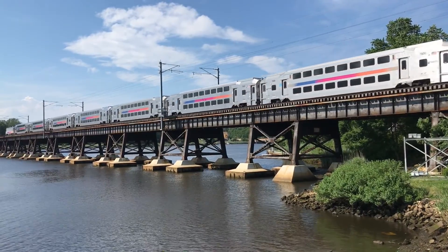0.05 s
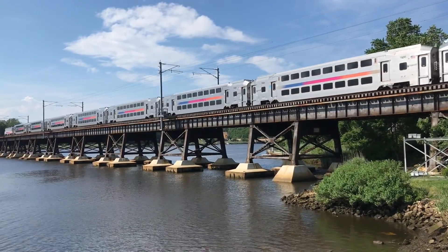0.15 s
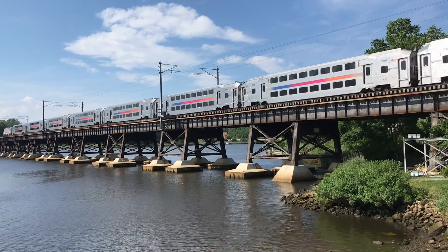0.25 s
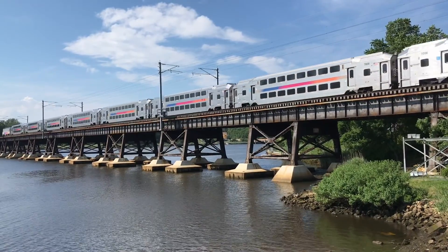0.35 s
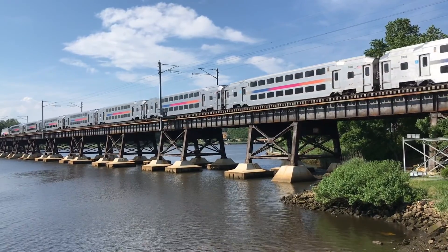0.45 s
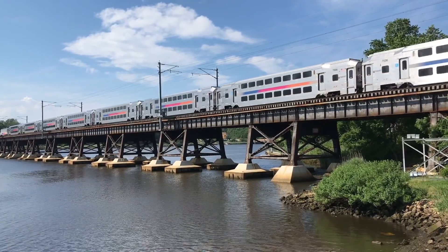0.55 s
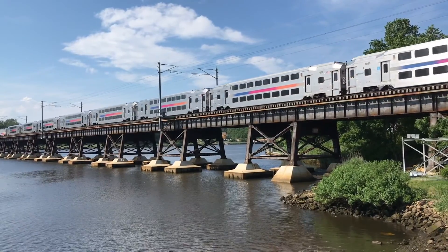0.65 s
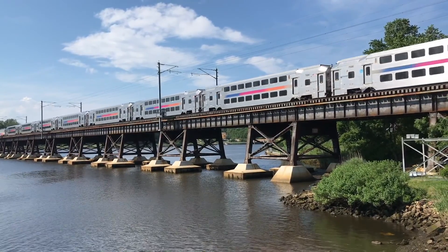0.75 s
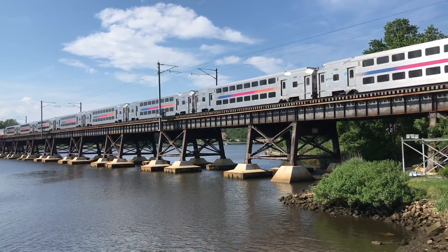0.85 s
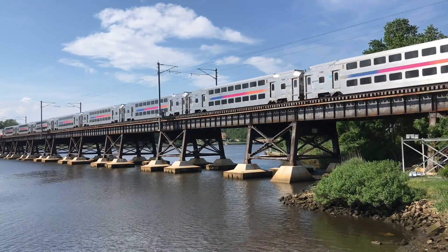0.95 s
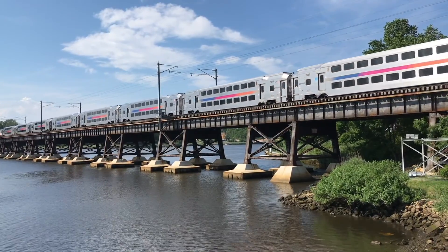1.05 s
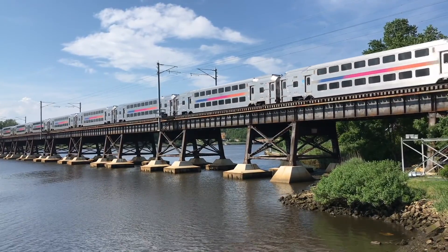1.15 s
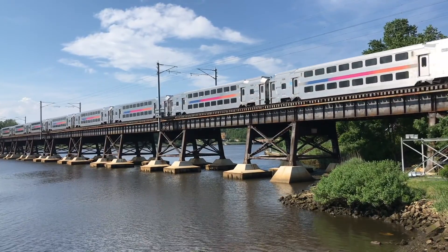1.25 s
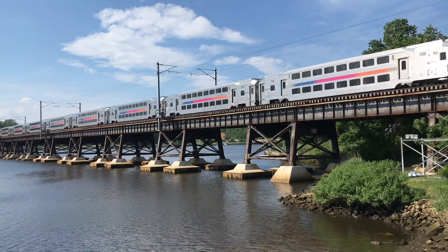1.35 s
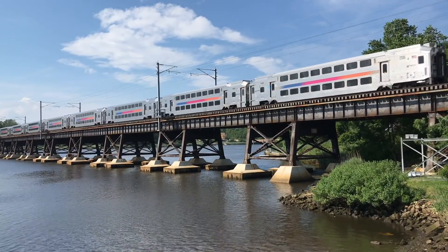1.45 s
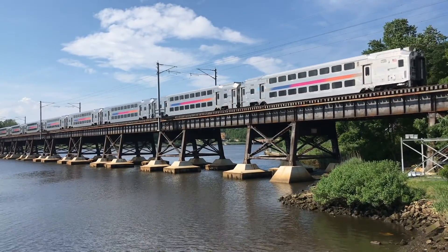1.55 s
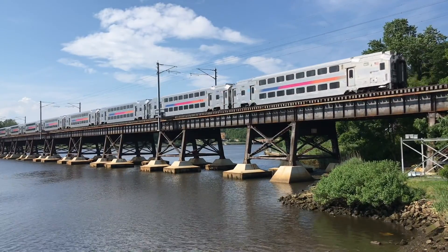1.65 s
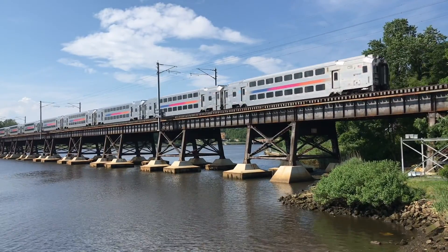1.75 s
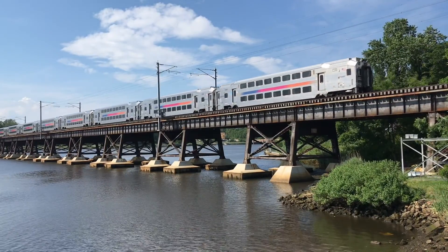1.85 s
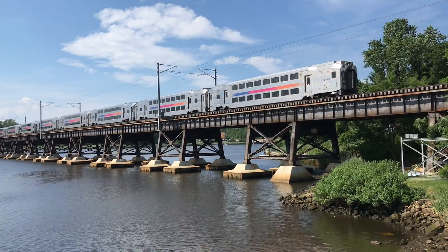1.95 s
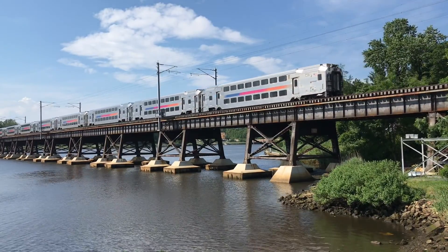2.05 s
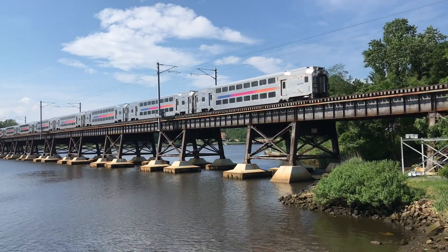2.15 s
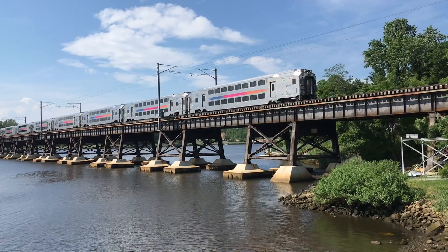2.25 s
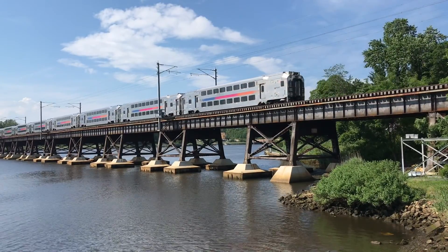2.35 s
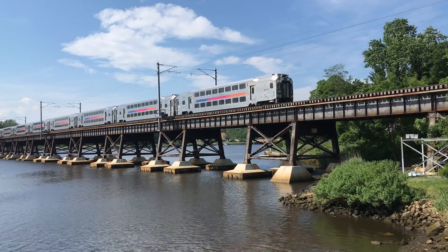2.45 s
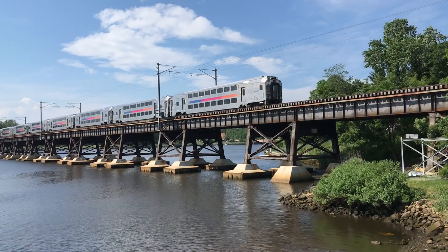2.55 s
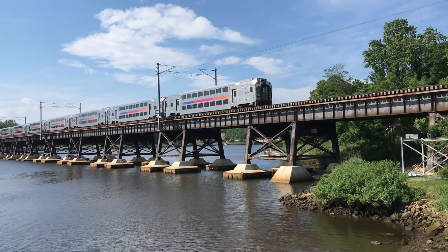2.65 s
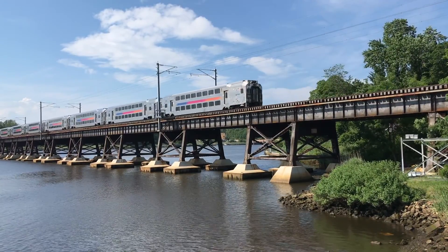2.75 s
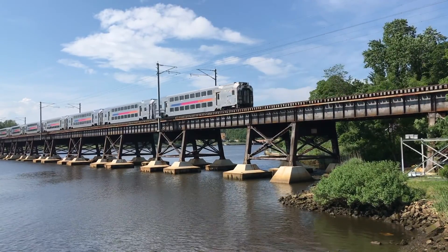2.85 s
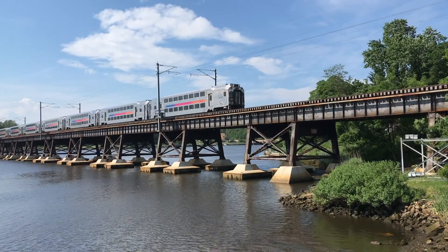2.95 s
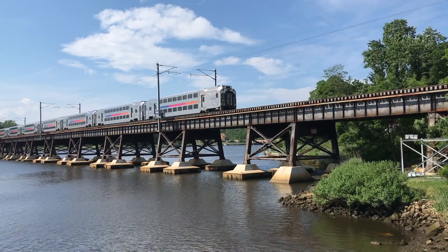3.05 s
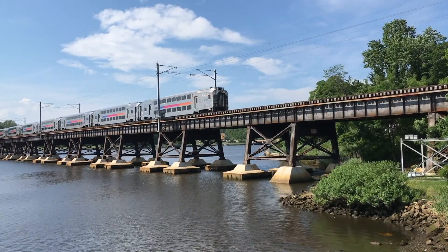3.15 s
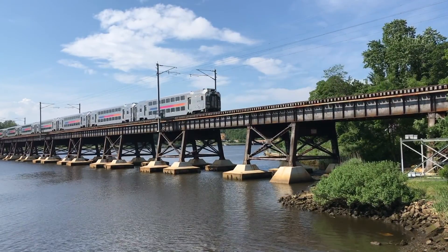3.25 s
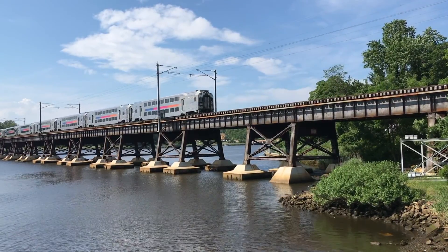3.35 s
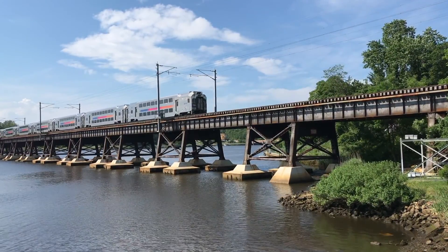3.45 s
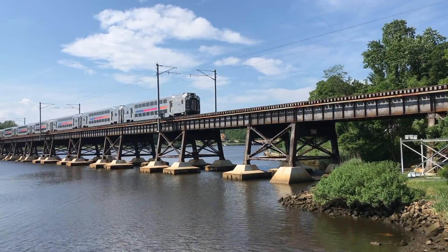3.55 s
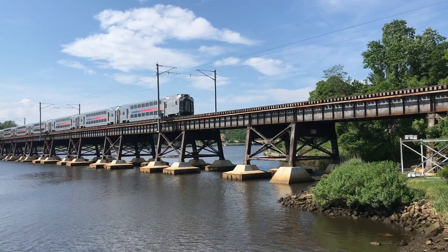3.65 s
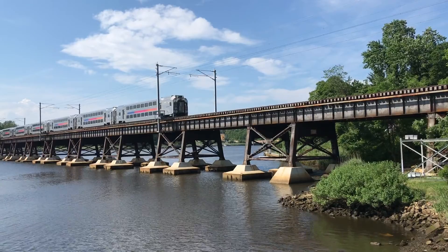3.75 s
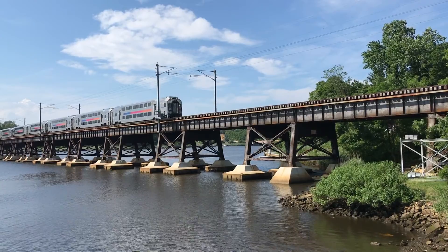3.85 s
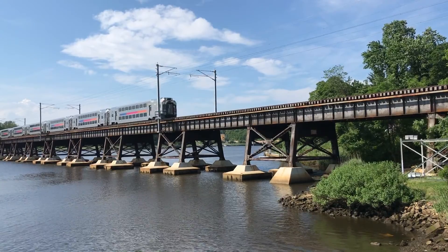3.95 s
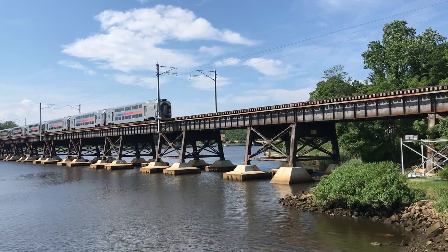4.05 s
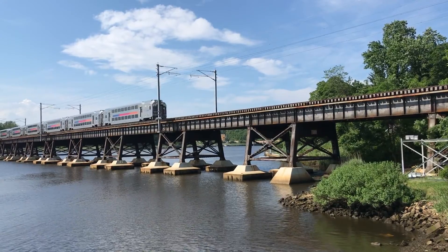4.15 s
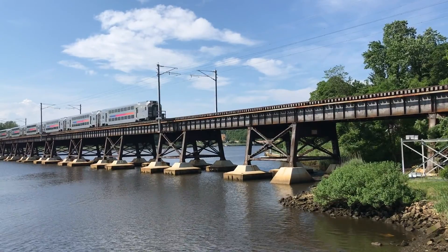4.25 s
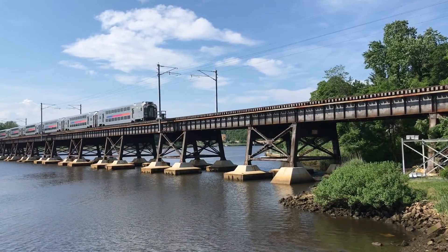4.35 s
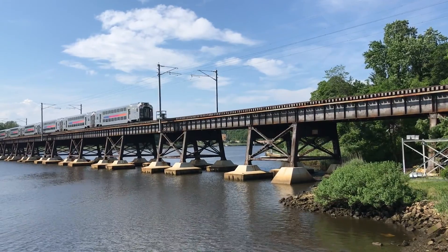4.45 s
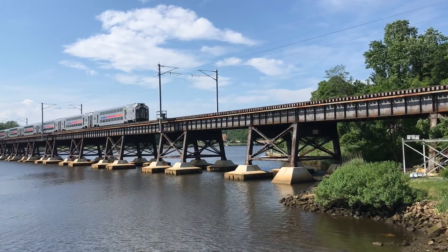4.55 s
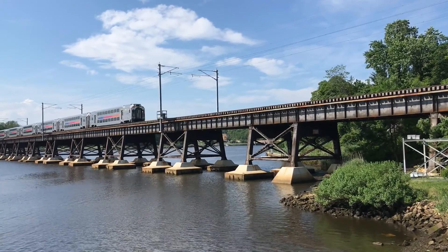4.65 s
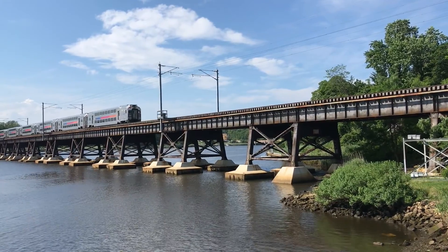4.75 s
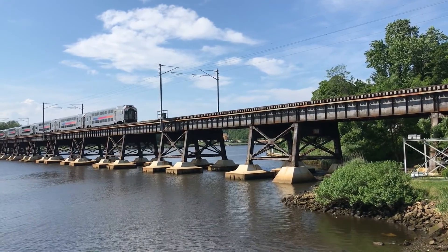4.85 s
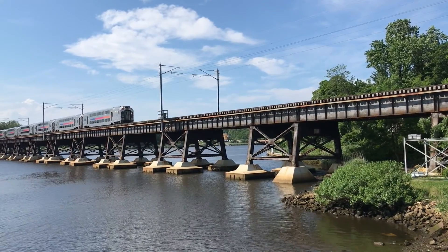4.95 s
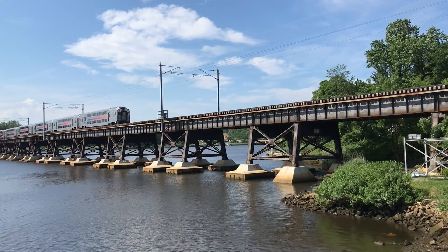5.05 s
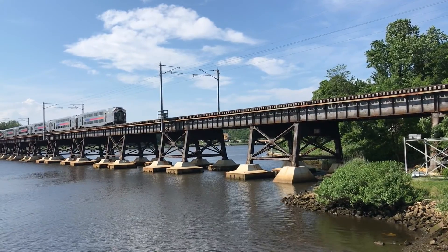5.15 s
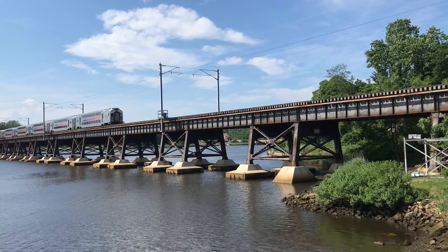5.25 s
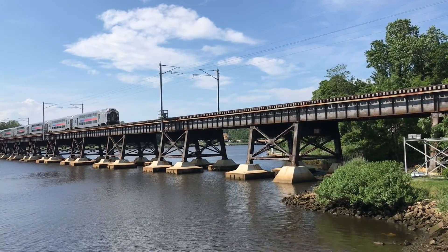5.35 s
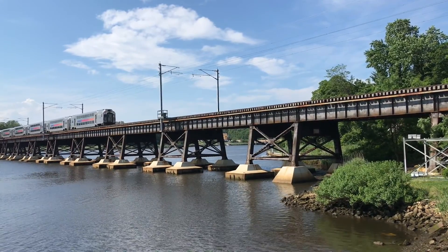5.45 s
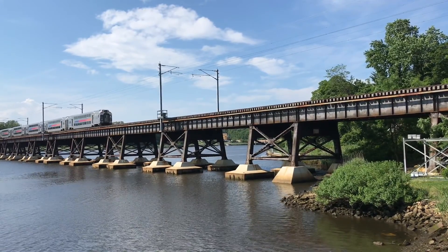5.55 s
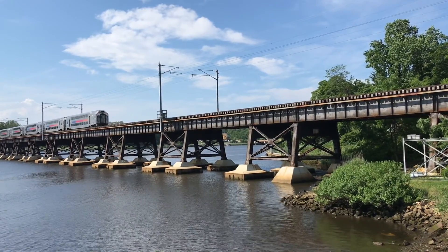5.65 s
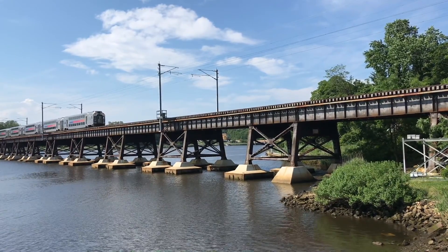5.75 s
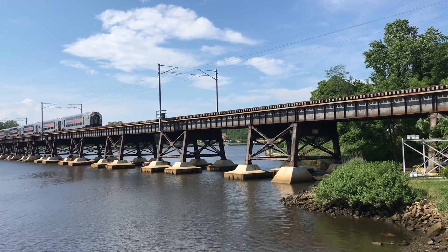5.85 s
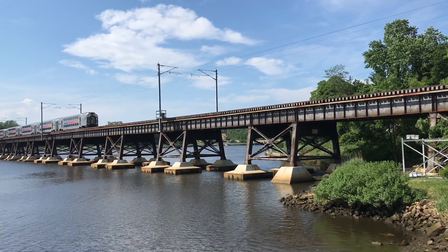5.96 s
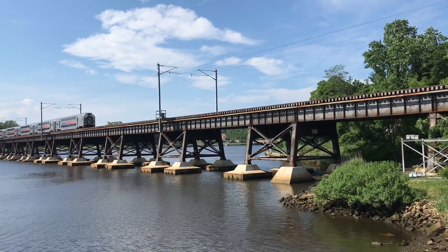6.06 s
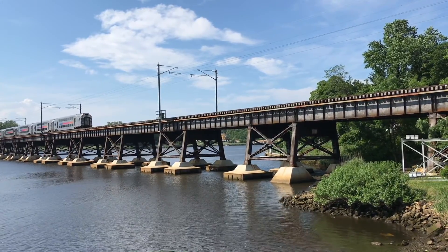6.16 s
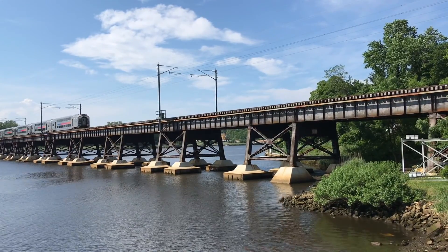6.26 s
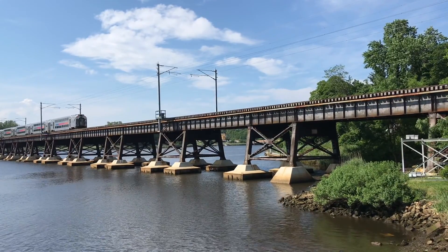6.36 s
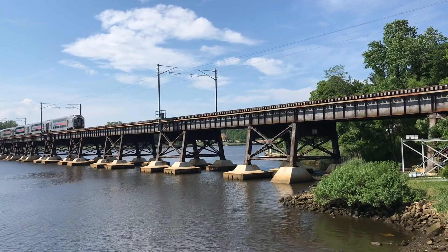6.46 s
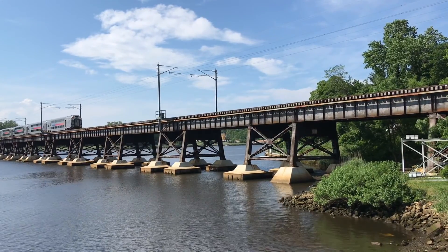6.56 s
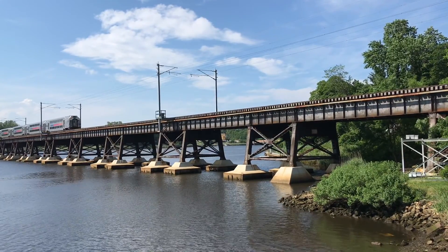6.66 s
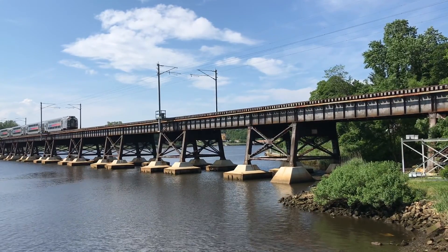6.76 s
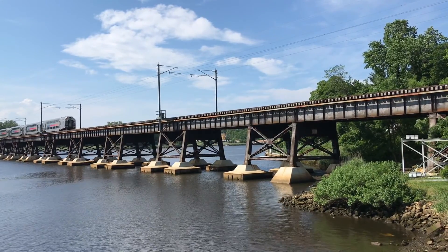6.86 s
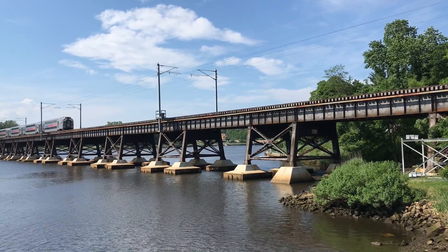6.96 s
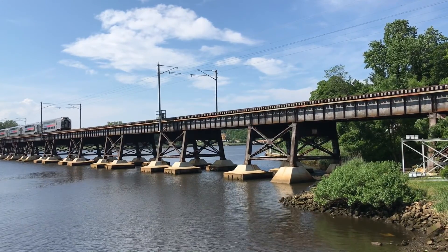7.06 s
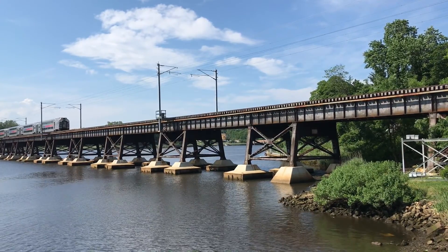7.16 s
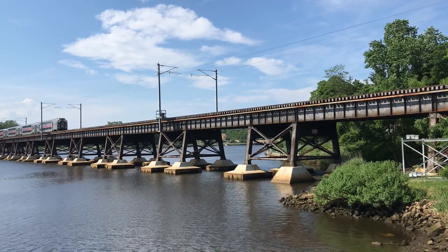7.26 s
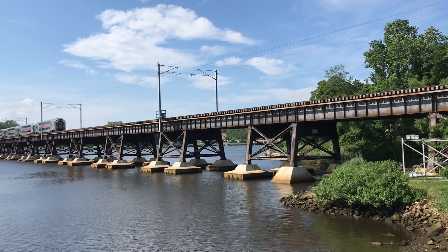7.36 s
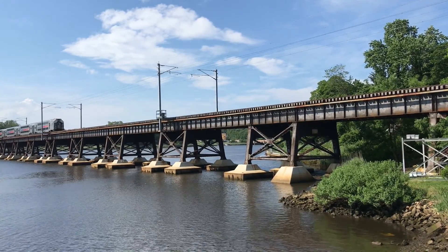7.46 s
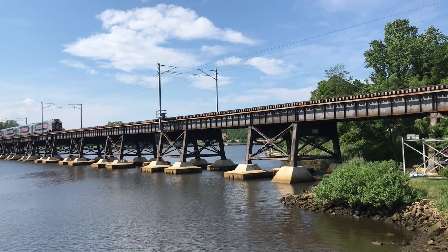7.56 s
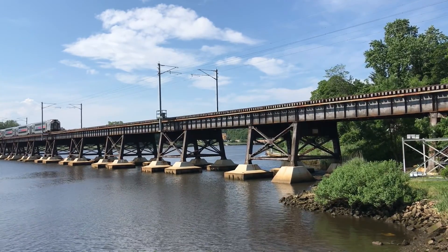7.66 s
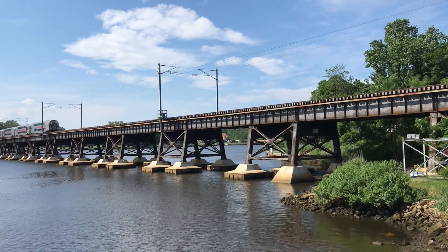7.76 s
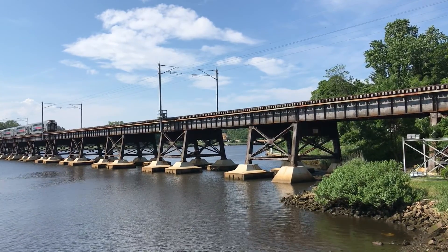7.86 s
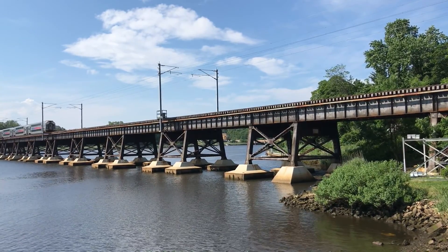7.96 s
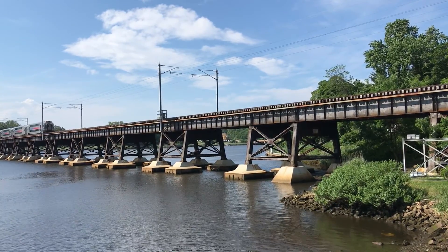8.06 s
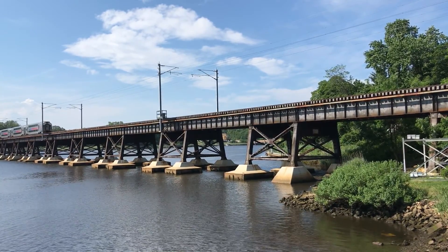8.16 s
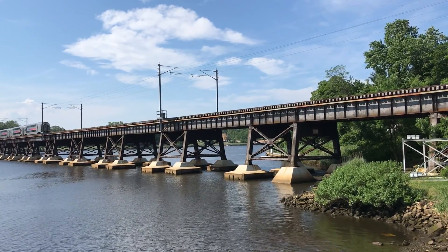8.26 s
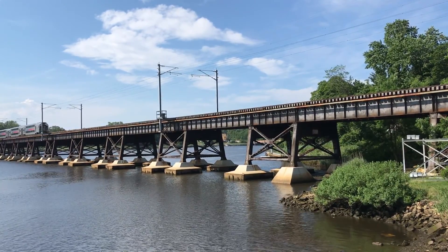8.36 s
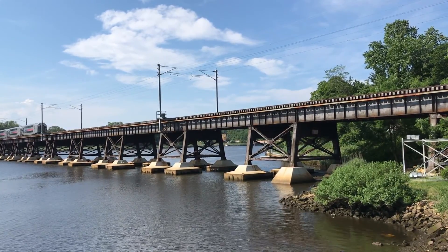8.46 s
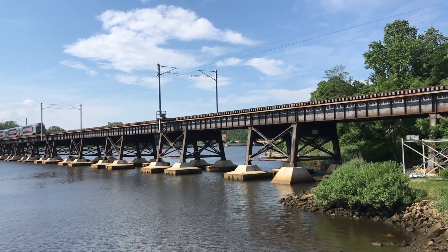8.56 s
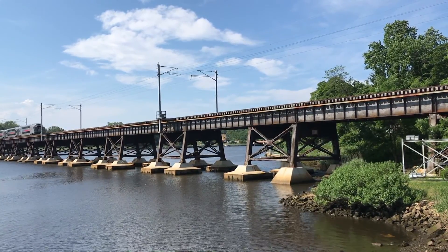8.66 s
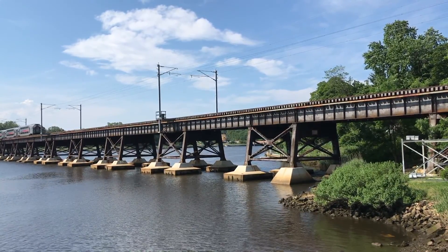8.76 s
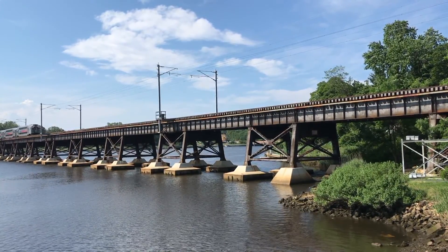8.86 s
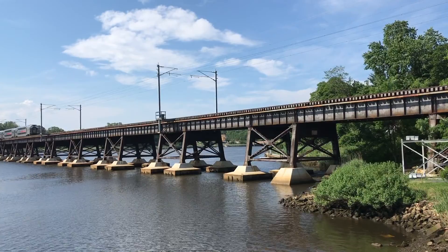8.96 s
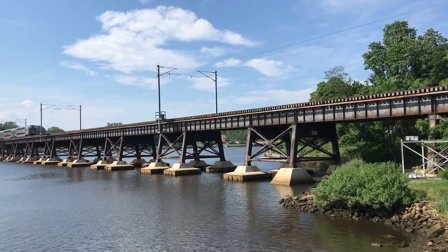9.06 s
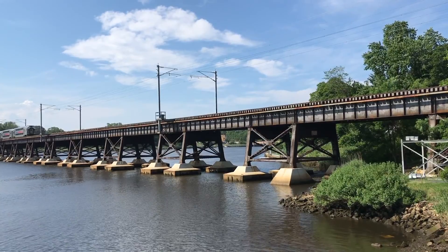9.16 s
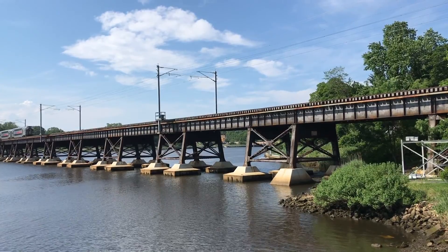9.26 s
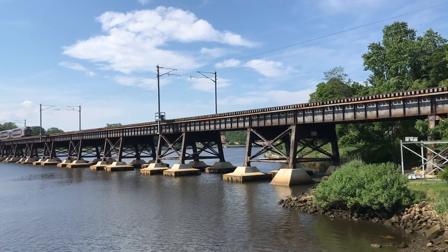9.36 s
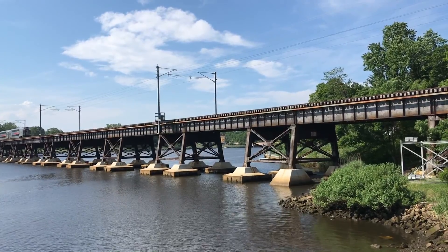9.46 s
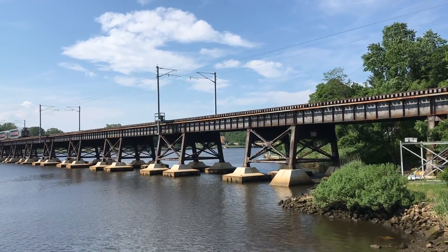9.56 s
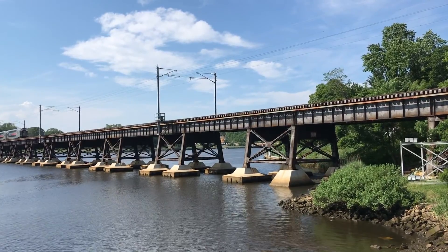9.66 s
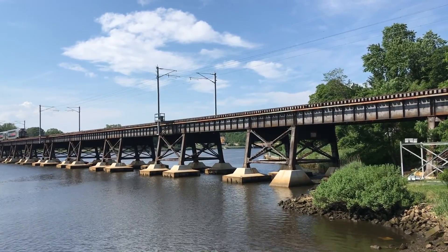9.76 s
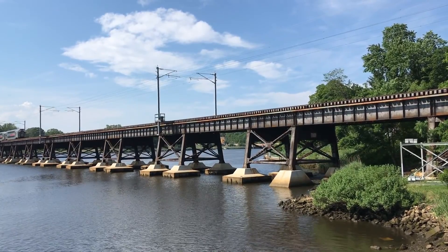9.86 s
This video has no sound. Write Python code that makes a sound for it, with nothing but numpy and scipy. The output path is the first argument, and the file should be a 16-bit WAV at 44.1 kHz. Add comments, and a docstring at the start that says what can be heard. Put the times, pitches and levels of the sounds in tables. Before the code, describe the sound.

From a river bank, a passenger train rolls away across a steel trestle bridge. Paired axles bang loudly over a nearby rail joint in the first two seconds, with metallic clatter and a tiny squeal. Heavy low boom, rough wheel roar and soft rail hiss continue, gradually weakening. A small bird chirps five times in nearby bushes. Late on, faint steel ticks precede a sharp distant double clack. Single-channel outdoor pickup.

```python
"""River bank by a steel trestle bridge: a passenger train rolls away over it.
Filtered noise makes the girder boom, wheel roar and rail hiss, under slow level curves.
Enveloped noise makes the last axles clatter over a near rail joint and later clack on a far one.
Swelling noise bands add bridge swells, a squeal and swishes; decaying sines and ticks are loose steel.
A small bird in the bushes repeats a falling chirp of frequency-modulated sines."""
import sys
import numpy as np
from scipy import signal
from scipy.fft import rfft, irfft, next_fast_len
from scipy.io import wavfile
from scipy.ndimage import uniform_filter1d

SR = 44100
rng = np.random.default_rng(int(sys.argv[2]) if len(sys.argv) > 2 else 0)


def log_audio(samples):
    """Write samples as a 16-bit WAV file to the path given in sys.argv[1]."""
    # one column per channel
    frames = np.atleast_2d(samples).T
    # limit to full scale, then quantise
    limited = np.clip(frames, -1, 1)
    pcm = np.round(limited * 32767).astype(np.int16)
    wavfile.write(sys.argv[1], SR, pcm)


N = 437016
TIME_S = np.arange(N) / SR

# Spectra: freq_hz, relative_db. Each is scaled to rms 1 before its level is applied.
# Level curves and part levels are set before the small trims in the source functions.

# bridge thuds under a bogie: peak_s, girder_rise_db, plate_rise_db
BOGIE_THUDS = [(.08, 11.5, 10.5), (.42, 3, 3.5), (.83, 3.5, 0), (2.16, 2, 3.5), (4.75, 0.5, 4),
               (5.73, 4, 4), (6.05, 4, 4), (6.86, 0.5, 5.5), (7.04, 6.5, 3.5), (7.38, 3, -0.5),
               (8.02, 4, 3)]
THUD_SIGMA_S, DECK_THUD_EXPONENT = 0.05, 0.75
PLATE_DB_PER_GIRDER_DB = 0.77
PLATE_KICK_DB = -3.5  # near-joint blow on the web plates, relative to its clang
# load on the bridge, rising, then easing as the train leaves: time_s, girder_boom_db, deck_sway_db
BRIDGE_LOAD = [(0, -30.5, -27.5), (.3, -24, -28), (.42, -20, -20), (2.2, -18.5, -23), (5.4, -20, -25.5),
               (5.8, -21, -21), (6.45, -21.5, -31), (8.5, -24, -33), (9.9, -24.5, -32.5)]
# girder spectrum: freq_hz, relative_db
GIRDER_SPECTRUM = [(60, -12), (82, -9.5), (105, -2.5), (121, 1.5), (142, -4.5), (165, -12), (230, -30.5)]
# deck spectrum: freq_hz, relative_db
DECK_SPECTRUM = [(12, -62), (24, -42), (33, -26), (42, -0.5), (63, 8.5), (82, 9), (110, -10.5)]
# web plate spectrum: freq_hz, relative_db
PLATE_SPECTRUM = [(130, -42), (170, -1), (200, -0.5), (255, 1), (305, -2), (370, -8.5), (460, -24),
                  (800, -25)]
# low swells of the bridge, with a thump at 6.92 s and a short knock at 8.55 s:
# peak_s, sigma_s, level_db, centre_hz, width_share (of centre)
BRIDGE_SWELLS = [(1.6, 0.24, -36.5, 1820, 0.26), (3.42, .07, -34, 600, 0.59),
                 (4.8, 0.16, -36.5, 1160, 0.23), (6.92, 0.065, -32.5, 540, 0.55),
                 (7.5, 0.22, -46, 1180, 0.16), (8.55, 0.013, -37, 700, 0.13), (9.4, 1, -39, 1070, 0.23)]
# wheels rolling: time_s, roar_db, roar_treble_db
WHEEL_LEVELS = [(0.0, -34, -39.8), (1.6, -33, -37), (2.4, -35.5, -38.5), (3.1, -34, -33), (4.0, -34.5, -38),
                (4.8, -34, -35.0), (6.2, -34.5, -39), (7.0, -36, -41), (8.1, -41.5, -43.9),
                (9.2, -42.5, -38.5), (9.9, -41, -38.5)]
# wheel roar spectrum: freq_hz, relative_db
ROAR_SPECTRUM = [(290, 0), (390, 4), (480, -0.5), (600, 3.5), (760, -1), (950, 1), (1200, -2.5),
                 (1500, -10.5), (2100, -22)]
# roar treble spectrum: freq_hz, relative_db
ROAR_TREBLE_SPECTRUM = [(900, -20), (1300, 1.5), (1600, 2), (1900, -0.5), (2200, -5), (2600, -12),
                        (3200, -31), (5000, -47)]
# rails under the wheels: time_s, hiss_db, sizzle_db
RAIL_LEVELS = [(0.0, -44.0, -66.4), (1.4, -46.5, -67.8), (3.0, -48, -68), (4.3, -47, -70.5),
               (5.3, -46, -66), (6.3, -48.0, -65), (7.7, -53.0, -74.6), (9.0, -53.5, -73.6),
               (9.9, -49.5, -70.9)]
# rail hiss spectrum: freq_hz, relative_db
HISS_SPECTRUM = [(1800, -6), (2800, 3.5), (3600, 1.5), (4500, 0), (4950, -5), (5400, -3.5), (7000, -6.5),
                 (7800, -11.5), (9400, -15.5), (10400, -20.5), (15000, -42)]
# fine rail sizzle spectrum: freq_hz, relative_db
SIZZLE_SPECTRUM = [(8000, -19), (10400, -12), (11100, 2), (11800, 0), (12900, -1.5), (14500, -2.5),
                   (15700, -8)]
# one short squeal at 0.83 s, then swelling swishes of noise from the rail:
# peak_s, sigma_s, level_db, centre_hz, width_share (of centre)
SQUEAL_AND_SWISHES = [(.829, 0.012, -41, 3520, .03), (2.15, 0.16, -45.5, 3600, 0.25),
                      (3.87, 0.11, -47.5, 3420, 0.21), (5.42, 0.15, -45, 3550, 0.16),
                      (5.42, 0.23, -57.5, 7750, 0.099), (5.53, .09, -63, 12500, .16),
                      (6.1, 0.23, -48, 2740, 0.3), (7.003, 0.15, -57, 6400, .3),
                      (9.85, 0.23, -47.5, 3400, 0.16)]
# axles over the near joint: start_s, clatter_db, clang_db, scrape_db, length_s
NEAR_AXLES = [(0.351, -39, -20.5, -61, 0.058), (0.481, -41, -20.5, -55, 0.066),
              (0.747, -39.5, -22.5, -55, 0.06), (0.875, -40, -20, -53, 0.049),
              (1.67, -38.5, -23.5, -53, 0.068), (1.796, -37, -20, -50, 0.048)]
# bridge clang spectrum: freq_hz, relative_db
CLANG_SPECTRUM = [(32, -10), (45, 38), (70, -2), (120, 6), (215, -13), (400, 16.5), (520, 5.5), (750, 6),
                  (1100, 1), (1450, 3), (1900, -4), (2600, -35)]
# rail clatter spectrum: freq_hz, relative_db
CLATTER_SPECTRUM = [(1500, -0.5), (2700, -4), (3600, -0.5), (4500, -0.5), (4950, -7), (5300, -7),
                    (7100, -9.5), (7800, -15), (8400, -11.5), (9600, -13.5), (10300, -25), (15000, -38)]
# bright scrape spectrum: freq_hz, relative_db
SCRAPE_SPECTRUM = [(8500, -15), (10500, -8), (11300, -7), (11800, 3), (12400, 2), (13100, -7), (13800, -4),
                   (14800, -8), (15700, -9)]
# wheel ring: freq_hz, width_hz, level_db
WHEEL_RING_MODES = [(5240, 130, -55), (10040, 170, -68), (11350, 200, -66), (11700, 260, -64),
                    (13400, 80, -69), (14800, 70, -72)]
# axles over the far joint: start_s, level_db, length_s
FAR_JOINT_AXLES = [(9.327, -26, 0.054), (9.478, -26, 0.068)]
# far clang spectrum: freq_hz, relative_db
FAR_CLANG_SPECTRUM = [(130, 6), (200, 16.5), (320, 0.5), (500, -6), (780, -7), (1080, 5), (1300, 0),
                      (1750, -7), (2600, -22), (4800, -36), (6300, -34), (8500, -46), (11500, -43),
                      (15000, -56)]
# loose steel: start_s, knock_db, tick_db, tick_hz
STEEL_KNOCKS = [(8.236, -50, -41, 4200), (8.309, -50, -35, 3800), (8.395, -45, -38, 5500),
                (8.456, -40, -35, 6550), (8.473, -45, -35, 4000), (8.571, -42, -34, 3900),
                (8.805, -50, -43, 7500), (9.271, -48, -41, 7000), (9.358, -11, -32.5, 5800),
                (9.5121, -11, -29.5, 6600), (9.5245, -22, -33, 4500)]
# ring of one knock: freq_hz, level_db, t60_s
KNOCK_MODES = [(815, -12, 0.011), (1090, -.5, 0.018), (1390, -5, .012), (1720, -8, 0.012),
               (2920, -23, .005), (9800, -23, 0.0026)]
# bird calls: start_s, level_db, pitch_factor
BIRD_CALLS = [(2.331, -36.5, .975), (3.797, -39, 1.), (4.785, -40, .96), (6.191, -37, 1.), (7.135, -37, 1.)]
# call syllables: delay_s, length_s, level_db, top_hz, crest_place (0-1), fall_hz, buzz_share (of pitch)
# top_hz and fall_hz are before pitch_factor
CALL_SYLLABLES = [(0, .05, -9.5, 5050, 0., 1350, .025), (.048, .018, -14, 3680, .7, 40, .01),
                  (.066, .052, 0, 3720, .42, 620, .016)]
LOWPASS_HZ = 15750


def bridge():
    """The moving load shakes girders, deck and thin web plates; thuds swell, joint blows kick the plates."""
    boom, sway = gains(BRIDGE_LOAD)
    peak_s, girder_rise_db, plate_rise_db = np.transpose(BOGIE_THUDS)
    thuds = surge(peak_s, girder_rise_db)
    hit_s, _, clang_db, _, length_s = np.transpose(NEAR_AXLES)
    kick = blows(hit_s, clang_db + PLATE_KICK_DB, length_s,
                 rise_s=0.018, t60_s=0.3, tail_db=-12, tail_t60_s=0.6)
    load_drone = amp(-14) * boom ** PLATE_DB_PER_GIRDER_DB * surge(peak_s, plate_rise_db)
    drone = np.hypot(load_drone, kick)
    girders = amp(0.42) * boom * thuds * steadied(body(GIRDER_SPECTRUM), span_s=0.099, share=0.65)
    deck = sway * thuds ** DECK_THUD_EXPONENT * steadied(body(DECK_SPECTRUM), span_s=0.13, share=0.45)
    plates = drone * steadied(body(PLATE_SPECTRUM), span_s=1.0, share=0.16)
    return girders + deck + plates


def bridge_swells():
    """Low swells of the bridge, with a thump at 6.92 s and a short knock at 8.55 s, as noise bands."""
    return swells(BRIDGE_SWELLS)


def rolling():
    """Rough treads roar on the rail and rattle the running gear; the rails hiss above."""
    roar, treble = gains(WHEEL_LEVELS)
    hiss, sizzle = gains(RAIL_LEVELS)
    wheels = amp(1.32) * roar * body(ROAR_SPECTRUM)
    wheels = wheels + amp(-1.54) * treble * body(ROAR_TREBLE_SPECTRUM)
    wheels = wheels * flutter(rate_hz=16.6, depth_db=0.9) * flutter(rate_hz=4.5, depth_db=0.17)
    rails = amp(-0.63) * hiss * body(HISS_SPECTRUM) + amp(-0.6) * sizzle * body(SIZZLE_SPECTRUM)
    return wheels + rails * flutter(rate_hz=28, depth_db=0.5)


def squeal_and_swishes():
    """One short squeal at 0.83 s, then swelling swishes of noise from the rail."""
    return swells(SQUEAL_AND_SWISHES)


def near_joint():
    """Each axle batters the joint: the bridge clangs, the rail clatters, and the wheel rings on."""
    start_s, clatter_db, clang_db, scrape_db, length_s = np.transpose(NEAR_AXLES)
    clang = amp(1.5) * steadied(body(CLANG_SPECTRUM), span_s=0.019, share=0.7)
    clang = clang * blows(start_s, clang_db, length_s / 2,
                          rise_s=0.01, t60_s=0.26, tail_db=-5, tail_t60_s=0.96)
    clatter = body(CLATTER_SPECTRUM) * blows(start_s, clatter_db, length_s,
                                             rise_s=0.015, t60_s=0.31, tail_db=-1.5, tail_t60_s=1.8)
    scrape = body(SCRAPE_SPECTRUM) * blows(start_s, scrape_db, length_s,
                                           rise_s=0.02, t60_s=0.2, tail_db=-10, tail_t60_s=1.1)
    ring = sum(amp(db) * band(hz, width_hz) for hz, width_hz, db in WHEEL_RING_MODES)
    # strongest clatter drives the ring at 0 dB
    ring = ring * blows(start_s, clatter_db - clatter_db.max(), length_s,
                        rise_s=0.02, t60_s=0.57, tail_db=-5, tail_t60_s=2.6)
    return (clang + clatter + scrape) * flutter(rate_hz=90, depth_db=1.0) + ring


def far_joint():
    """A pair of axles crosses a distant joint, duller through the air, and chatters as it lands."""
    start_s, level_db, length_s = np.transpose(FAR_JOINT_AXLES)
    chatter = evened(flutter(rate_hz=110, depth_db=3))
    envelope = blows(start_s, level_db, length_s,
                     rise_s=0.0063, t60_s=0.11, tail_db=-5, tail_t60_s=1.0)
    return body(FAR_CLANG_SPECTRUM) * chatter * envelope


def loose_steel():
    """Loose parts snap together: a short ringing knock, topped by a thin tick a few cycles long."""
    parts = np.zeros(N)
    age_s = TIME_S[:SR // 10]
    knock = sum(amp(db - 60 * age_s / t60_s) * np.sin(2 * np.pi * hz * age_s)
                for hz, db, t60_s in KNOCK_MODES)
    # contact builds over 0.48 ms
    knock = knock * np.sin(np.pi / 2 * np.minimum(age_s / 0.00048, 1)) ** 2
    for start_s, knock_db, tick_db, tick_hz in STEEL_KNOCKS:
        cycles = tick_hz * age_s
        tick = np.exp(-((cycles - 4) / 1.6) ** 2) * np.sin(2 * np.pi * cycles)
        parts[round(start_s * SR):][:len(age_s)] += amp(knock_db) * knock + amp(tick_db) * tick
    return parts + amp(-10) * scattered(parts, tau_s=0.012)


def bird():
    """A buzzy falling slur, a faint pip and a short arched note, slightly scattered by the leaves."""
    song = np.zeros(N)
    buzz = band(210, 70)
    tremor = flutter(rate_hz=170, depth_db=2.2)
    for call_s, call_db, pitch_factor in BIRD_CALLS:
        for delay_s, length_s, db, top_hz, crest, fall_hz, buzz_share in CALL_SYLLABLES:
            start_s = call_s + delay_s
            on = (TIME_S >= start_s) & (TIME_S < start_s + length_s)
            progress = np.clip((TIME_S[on] - start_s) / length_s, 0, 1)
            arch = (abs(progress - crest) / (1 - crest)) ** 1.5
            pitch_hz = pitch_factor * (top_hz - fall_hz * arch)
            cycles = np.cumsum(pitch_hz * (1 + buzz_share * buzz[on])) / SR
            tone = np.sqrt(2) * np.sin(np.pi * progress) * np.sin(2 * np.pi * cycles)
            song[on] += amp(call_db + db) * tone
    song = song * tremor
    return song + amp(-17) * scattered(song, tau_s=0.04)


def amp(db):
    """Decibels to gain."""
    return 10 ** (np.asarray(db) / 20)


def evened(x):
    """Scales to rms 1."""
    return x / np.sqrt(np.mean(x ** 2) + 1e-20)


def gains(table):
    """Level curves in dB, interpolated to a gain per sample."""
    time_s, *columns_db = np.transpose(table)
    return [amp(np.interp(TIME_S, time_s, db)) for db in columns_db]


def shaped(shape):
    """Random vibration of rms 1: white noise with its spectrum multiplied by shape(hz)."""
    size = next_fast_len(N)
    hz = np.fft.rfftfreq(size, 1 / SR) + 1e-3
    spectrum = rfft(rng.standard_normal(size)) * shape(hz)
    return evened(irfft(spectrum, size)[:N])


def body(points):
    """Dense modes of a steel part, with cubic skirts beyond the ends of its spectrum."""
    point_hz, point_db = np.transpose(points)

    def shape(hz):
        curve = amp(np.interp(np.log(hz), np.log(point_hz), point_db))
        skirts = np.minimum(1, np.minimum(hz / point_hz[0], point_hz[-1] / hz)) ** 3
        return curve * skirts

    return shaped(shape)


def band(centre_hz, width_hz):
    """Random vibration of one resonance; its gain is 1/4 at width_hz from the centre."""
    return shaped(lambda hz: 1 / (1 + ((hz - centre_hz) / width_hz) ** 2) ** 2)


def flutter(rate_hz, depth_db):
    """Random gain of rms depth_db, wavering mostly below rate_hz."""
    return amp(depth_db * shaped(lambda hz: 1 / (1 + (hz / rate_hz) ** 4)))


def steadied(x, span_s, share):
    """Removes a share of a vibration's slow chance swings, so that it follows its drive."""
    window = int(span_s * SR) + 1
    power = abs(uniform_filter1d(uniform_filter1d(x ** 2, window), window))
    return evened(x / (power + 1e-9) ** (np.clip(share, 0, 1) / 2))


def burst(start_s, length_s, rise_s, t60_s, tail_db, tail_t60_s):
    """Blow envelope: rises, holds to its length, drops, and leaves a tail in the structure."""
    after_s = np.maximum(TIME_S - start_s - length_s, 0)
    tail = min(amp(tail_db), 1)
    attack = np.clip((TIME_S - start_s) / rise_s, 0, 1)
    return attack * ((1 - tail) * amp(-60 * after_s / t60_s) + tail * amp(-60 * after_s / tail_t60_s))


def blows(starts_s, levels_db, lengths_s, rise_s, t60_s, tail_db, tail_t60_s):
    """Envelope of several blows on one part; their powers add."""
    power = sum((amp(db) * burst(start_s, length_s, rise_s, t60_s, tail_db, tail_t60_s)) ** 2
                for start_s, db, length_s in zip(starts_s, levels_db, lengths_s))
    return np.sqrt(power)


def surge(peaks_s, rises_db):
    """Gain that swells and falls back at each thud."""
    return amp(sum(db * np.exp(-((TIME_S - peak_s) / THUD_SIGMA_S) ** 2 / 2)
                   for peak_s, db in zip(peaks_s, rises_db)))


def swells(rows):
    """Noise bands, each swelling and fading under a Gaussian envelope."""
    total = np.zeros(N)
    for peak_s, sigma_s, level_db, centre_hz, width_share in rows:
        envelope = np.exp(-((TIME_S - peak_s) / sigma_s) ** 2 / 2)
        total += amp(level_db) * envelope * band(centre_hz, 1.57 * width_share * centre_hz)
    return total


def scattered(x, tau_s):
    """Dense reflections off nearby things, decaying by 1/e per tau_s."""
    age_s = TIME_S[:SR // 2]
    echoes = rng.standard_normal(len(age_s)) * np.exp(-age_s / tau_s)
    return signal.fftconvolve(x, echoes / np.linalg.norm(echoes))[:N]


def scene():
    """Train and bird summed at the bank, one channel."""
    train = bridge() + bridge_swells() + rolling() + squeal_and_swishes()
    train = train + near_joint() + far_joint() + loose_steel()
    return (train + bird())[None]


def record(dry):
    """Linear-phase low-pass at LOWPASS_HZ."""
    lowpass = signal.firwin(801, LOWPASS_HZ, window=("kaiser", 9), fs=SR)
    return signal.oaconvolve(dry, lowpass[None], "same")


dry = scene()
out = record(dry)
log_audio(out)
```